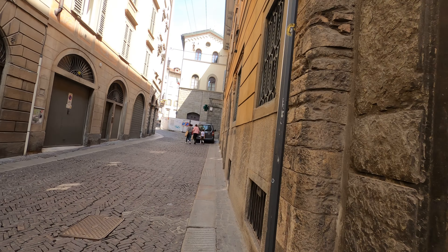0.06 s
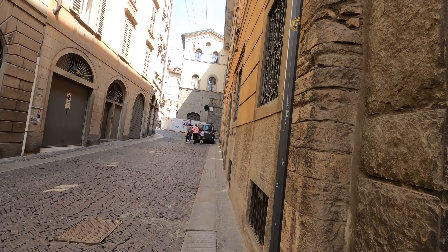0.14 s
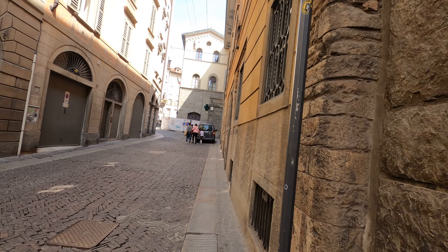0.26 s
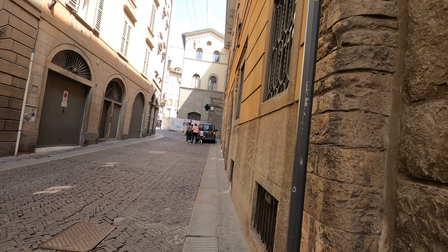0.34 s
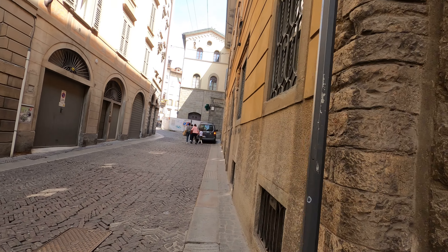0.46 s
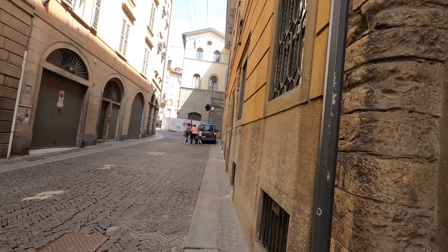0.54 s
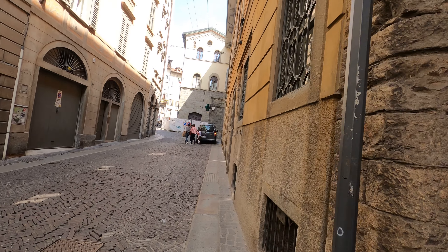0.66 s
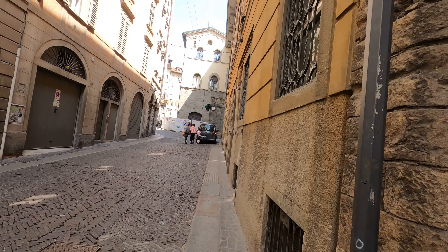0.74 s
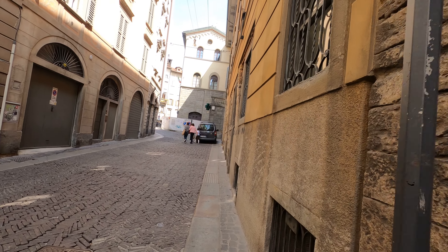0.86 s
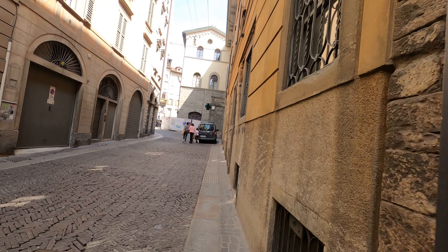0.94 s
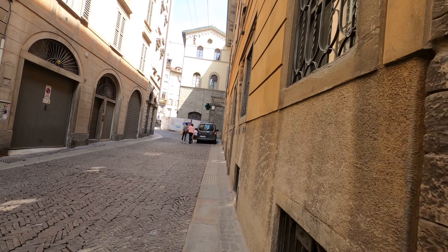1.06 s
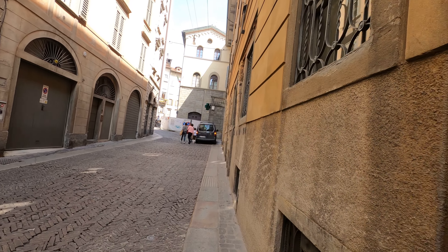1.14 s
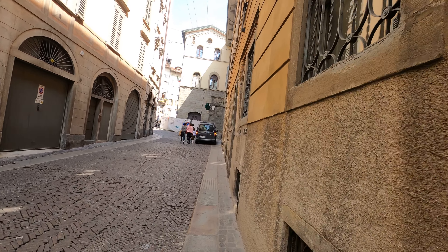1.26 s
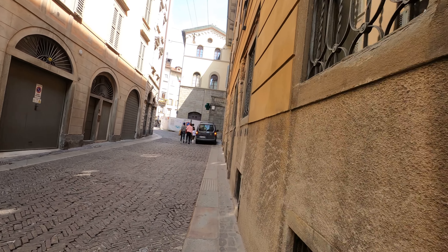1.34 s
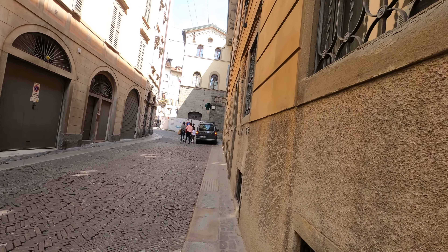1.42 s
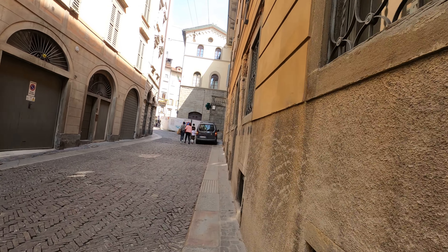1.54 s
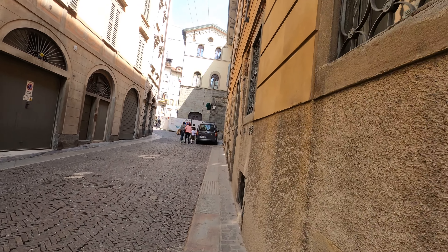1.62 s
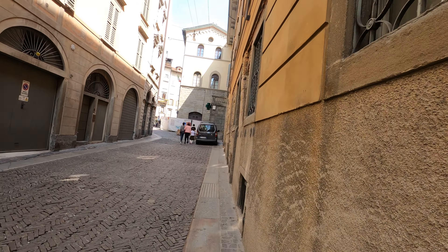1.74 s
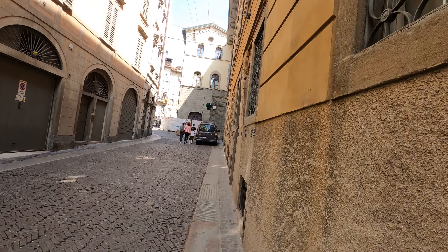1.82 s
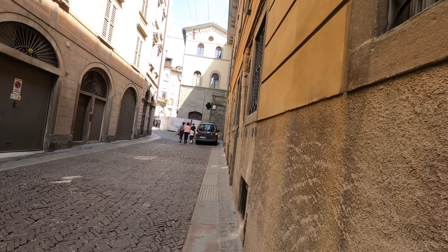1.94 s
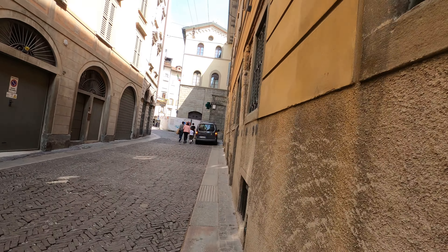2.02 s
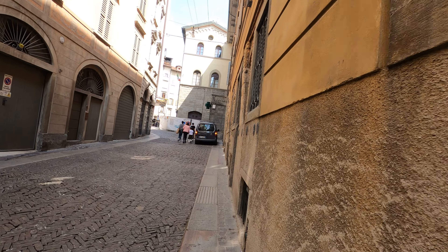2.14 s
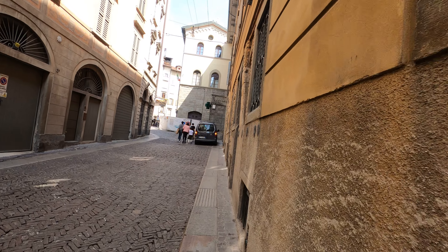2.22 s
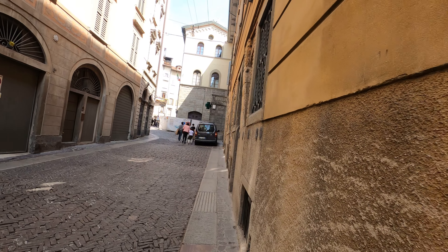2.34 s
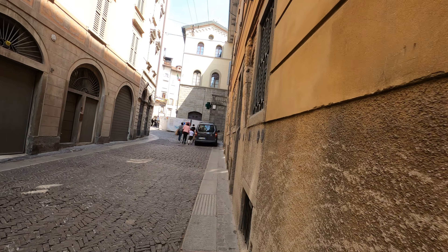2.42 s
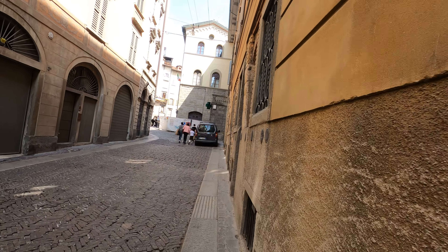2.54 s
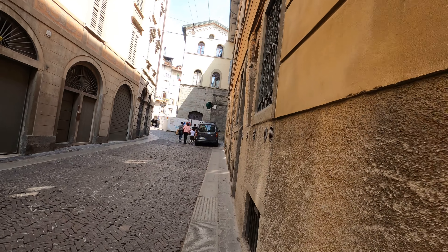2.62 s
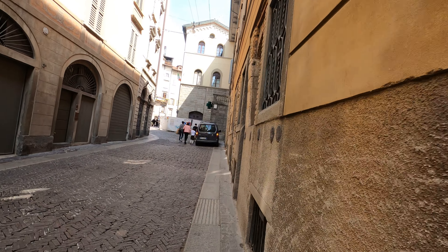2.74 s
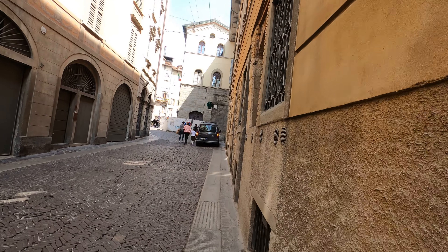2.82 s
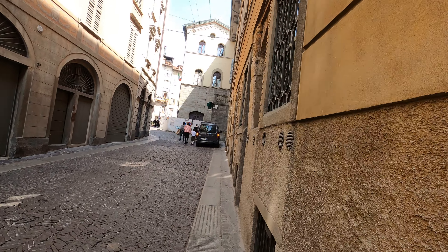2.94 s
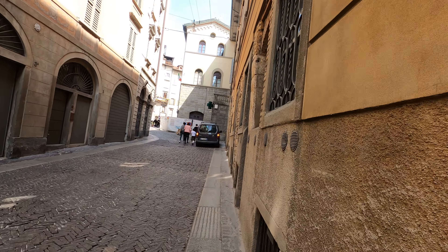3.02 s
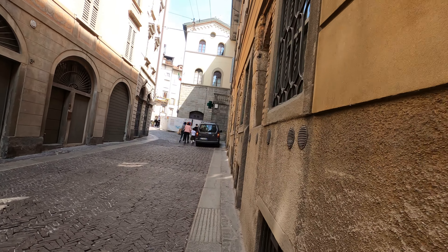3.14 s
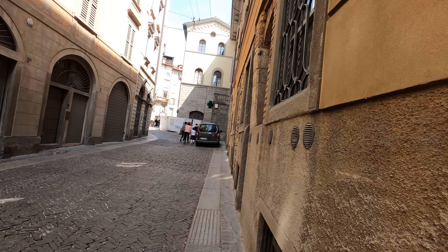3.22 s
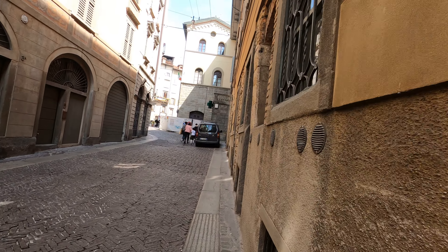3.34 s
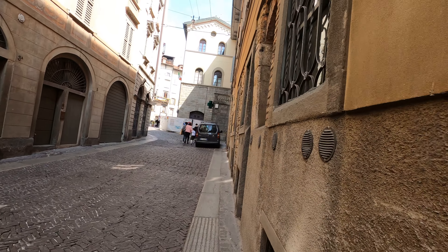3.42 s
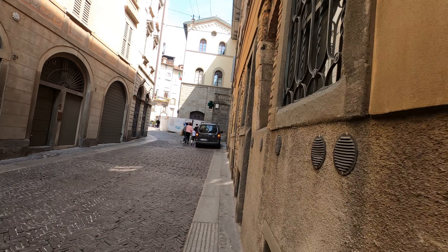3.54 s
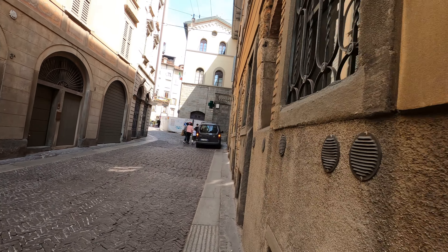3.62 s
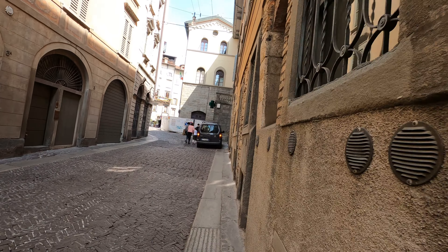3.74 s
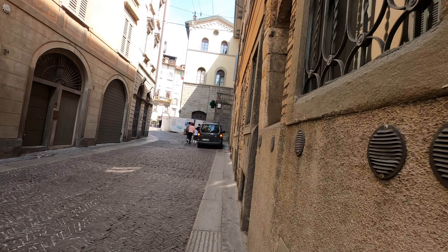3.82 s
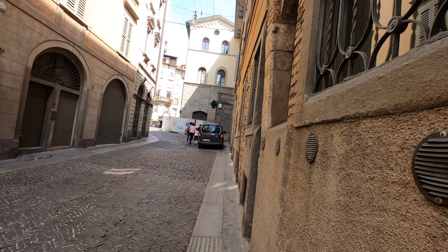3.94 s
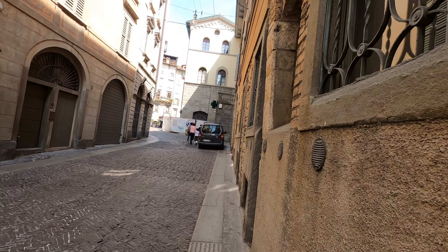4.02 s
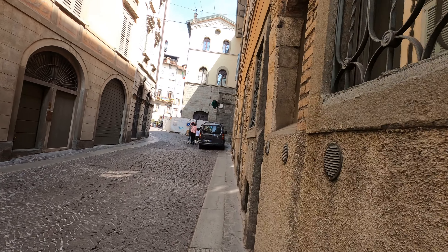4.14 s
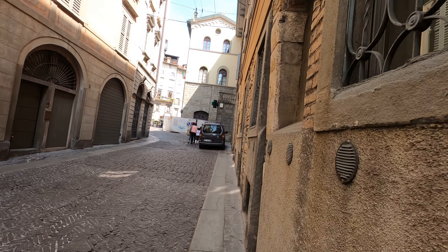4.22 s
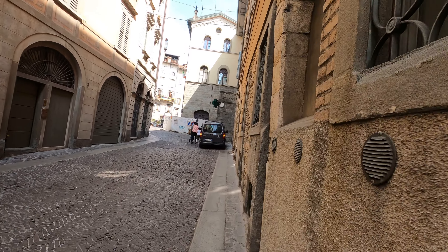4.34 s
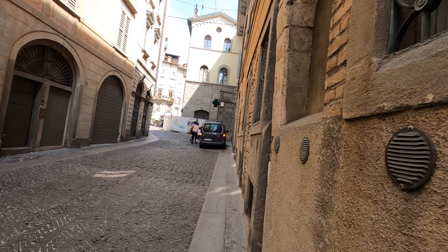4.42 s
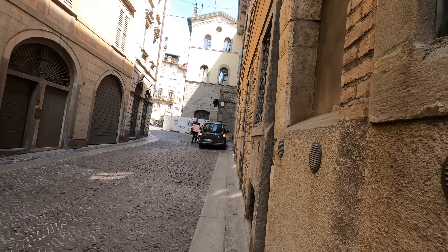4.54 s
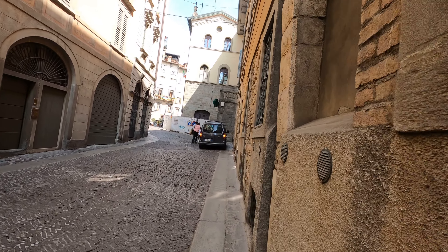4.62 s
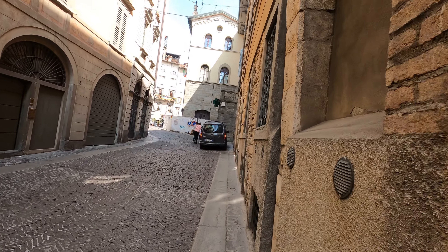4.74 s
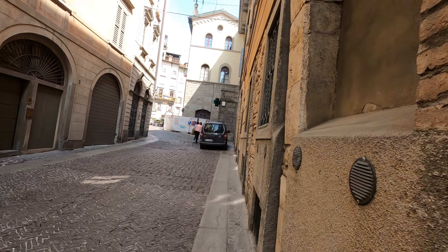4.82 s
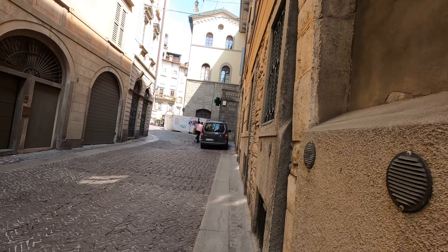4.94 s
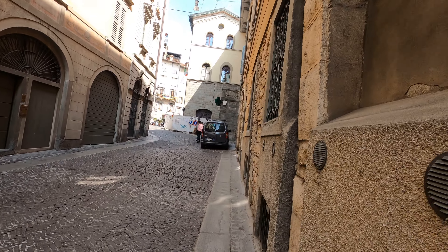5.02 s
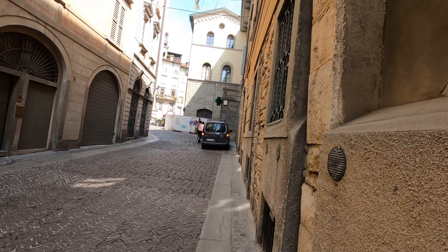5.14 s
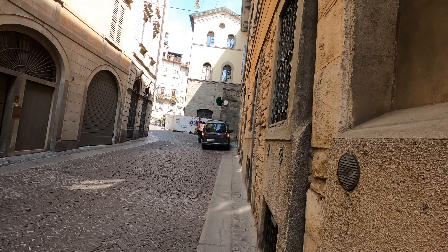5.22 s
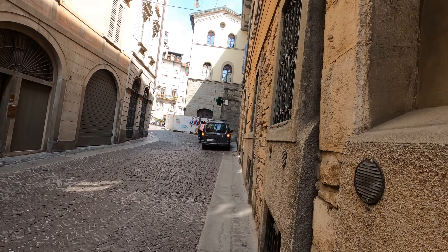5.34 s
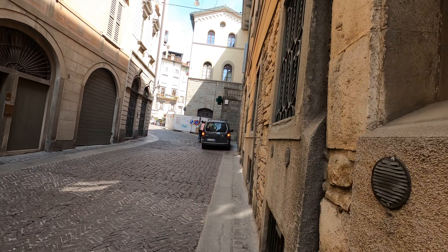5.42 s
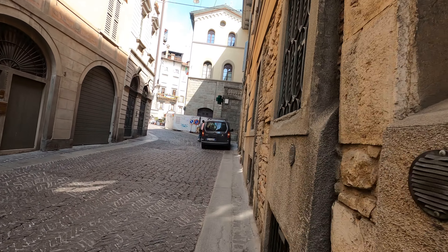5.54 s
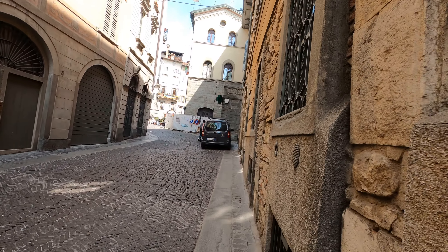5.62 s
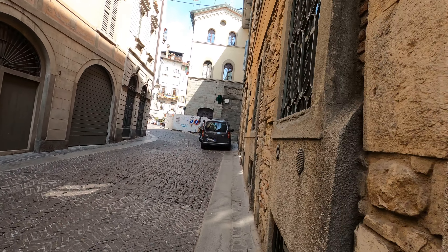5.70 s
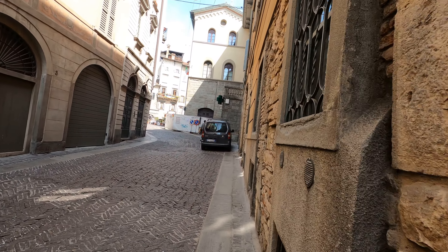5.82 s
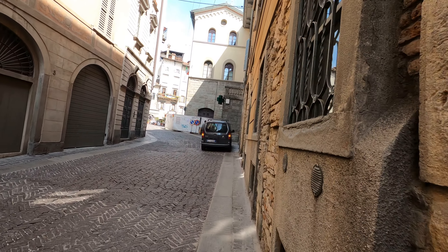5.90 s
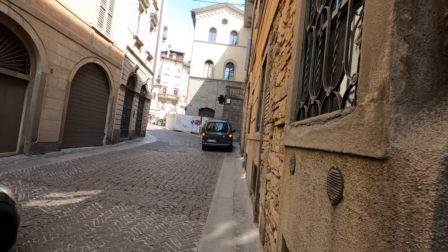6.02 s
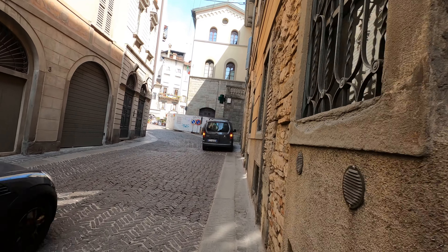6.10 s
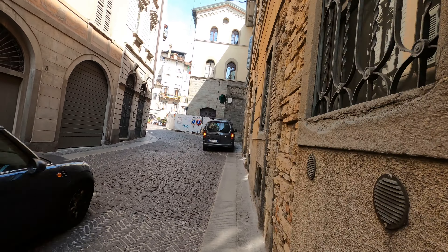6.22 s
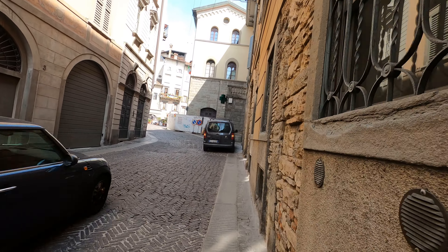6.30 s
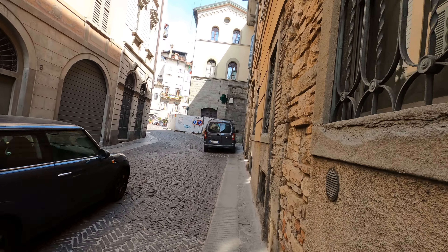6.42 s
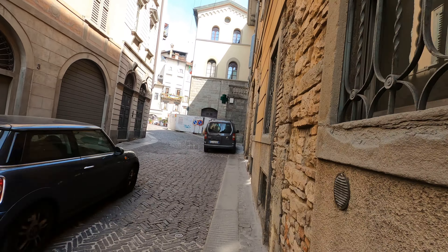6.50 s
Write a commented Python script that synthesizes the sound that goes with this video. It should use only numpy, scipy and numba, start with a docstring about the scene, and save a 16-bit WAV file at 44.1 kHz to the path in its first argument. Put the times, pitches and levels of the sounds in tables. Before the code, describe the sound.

A close, bass-heavy street ambience between stone house fronts. At 0 s a deep boom fades into tyre drone and soft hiss, with light wind bumps around 0.3-0.4 s. From about 0.3 s an exhaust hum swells and sinks, strongest near 0.9 s, while a fainter engine idles further off until about 3 s. Tiny airy scuffs and ticks are scattered through the first 3.5 s. At 2.05-2.3 s wind buffets the microphone heavily, louder on the left; then the treble dips briefly and the stereo narrows to the centre. Tyre roar peaks around 2.7-3.2 s. Cobbles thud strongly from 3.2 s, especially near 4 s, with a rough tread song around 4.8-5.8 s. The engine pitch falls from 4.3 s as its hum grows. Around 5.8-6.1 s come a dull wheel knock, small rattles and faint breathy whistles abreast; a low coasting hum continues to 6.6 s.

```python
"""A deep boom and the drone and hiss of tyres open the scene, soon joined by a humming exhaust:
a car comes up a narrow cobbled street from behind a walker and slows as it draws level.
Tyres and stones are trains of small blows and noise through resonant filters; engines are sums of sines.
Wind, noise shaped into eddies, buffets two microphone ports, after which the stereo picture
closes to the centre; scuffs, faint ticks, knocks and whistles are short or steady bands of noise."""
import sys
import numpy as np
from scipy import signal
from scipy.fft import rfft, irfft
from scipy.io import wavfile
from scipy.ndimage import uniform_filter1d, minimum_filter1d
from numba import njit

SR = 44100
rng = np.random.default_rng(int(sys.argv[2]) if len(sys.argv) > 2 else 0)


def persist_wave(psi):
    """Save psi, clipped to +-1, as 16-bit WAV."""
    counts = np.round(np.clip(psi, -1, 1) * 32767).astype(np.int16)
    wavfile.write(sys.argv[1], SR, np.atleast_2d(counts).T)


def level_to_linear(level):
    """Convert decibel levels to linear amplitude factors, elementwise."""
    exponent = np.asarray(level, float) / 20
    return 10 ** exponent


N = 289737
TIME = np.arange(N) / SR
HZ = np.maximum(np.arange(N // 2 + 1) * SR / N, 1)
CLOSE_S = 2.29  # the stereo picture starts to close and the treble dips


def curves(table):
    """Piecewise-linear envelopes: columns of a table joined by straight lines in time."""
    s, *columns = np.transpose(table)
    return [np.interp(TIME, s, c) for c in columns]


def colour(x, points):
    """Zero-phase spectral weighting by (Hz, dB) points on a log frequency axis."""
    hz, db = np.transpose(points)
    gain_db = np.interp(np.log(HZ), np.log(hz), db)
    return irfft(rfft(x) * level_to_linear(gain_db), N)


def peak(hz, width):
    """Lorentzian resonance curve, 1 at its centre and half at the edges of its width."""
    return 1 / (1 + (2 * (HZ - hz) / width) ** 2)


def unit(x):
    """Normalisation to an rms of 1."""
    return x / np.sqrt(np.mean(x ** 2))


def walk(rate):
    """Slow random modulation: levels held 1 / rate s and smoothed twice; spread near 1."""
    k = int(SR / rate)
    held = np.repeat(rng.standard_normal(N // k + 1), k)
    return 1.3 * uniform_filter1d(uniform_filter1d(held, k), k)[:N]


@njit
def svf(x, hz, width):
    """Second-order resonance: state-variable band-pass with a moving centre, gain 1 there."""
    y, band, low = np.empty(len(x)), 0., 0.
    for i in range(len(x)):
        g, k = np.tan(np.pi * hz[i] / SR), width[i] / hz[i]
        v = (band + g * (x[i] - low)) / (1 + g * (g + k))
        band = 2 * v - band
        low = low + 2 * g * v
        y[i] = k * v
    return y


def strikes(per_s, jitter, scatter_db):
    """Impulsive excitation: one blow per edge met, unevenly spaced, of uneven but bounded strength."""
    rate = per_s * np.exp(jitter * walk(60))
    count = np.floor(np.cumsum(rate) / SR)
    strength = level_to_linear(scatter_db * rng.uniform(0.23, 1, N))
    return np.diff(count, prepend=0) * strength


def bell(s, length):
    """Gaussian envelope: a smooth swell around s with standard deviation length."""
    return np.exp(-.5 * ((TIME - s) / length) ** 2)


def bursts(table, spread):
    """Transient band noise: short Gaussian swells, steep on both sides of their centre."""
    out = np.zeros(N)
    for s, db, length, hz in table:
        span = slice(max(int((s - .2) * SR), 0), int((s + 0.25) * SR))
        centre = np.full(N, 1. * hz)[span]
        noise = rng.standard_normal(len(centre))
        for _ in range(3):
            noise = svf(noise, centre, spread * centre)
        out[span] += level_to_linear(db) * bell(s, length)[span] * unit(noise)
    return out


def swells(table):
    """Power summation: level and centre Hz of overlapping swells; the strongest dominates the centre."""
    power = np.array([(level_to_linear(db) * bell(s, length)) ** 2 for s, db, length, _ in table]) + 1e-12
    total = np.sum(power, axis=0)
    return np.sqrt(total), np.transpose(table)[3] @ power / total


def engine(hz, db, overtones, waver, flutter_db):
    """Harmonic synthesis: firing tone and overtones; speed wavers, partials flutter as echoes shift."""
    high_revs_hz, coasting_hz = 70, 56.4
    load = np.clip((hz - coasting_hz) / (high_revs_hz - coasting_hz), 0, 1)
    phase = 2 * np.pi * np.cumsum(hz * (1 + waver * walk(12))) / SR
    # a pulling engine is more uneven than a coasting one
    uneven_db = flutter_db * (.2 + .8 * load)
    total = np.zeros(N)
    for multiple, high_db, coast_db in overtones:
        partial_db = coast_db + (high_db - coast_db) * load + uneven_db * walk(14)
        total += level_to_linear(partial_db) * np.sin(multiple * phase)
    return np.sqrt(2) * level_to_linear(db) * total


def tyres():
    """Rolling noise: dense blows and noise, coloured by the street, in bands that swell apart."""
    # tyres: t/s, roar level/dB, carcass drum against roar/dB, hiss against roar/dB
    rolling = [(0, -37.5, 7.5, -15), (.7, -34, 4.5, -18.5), (1.5, -35.5, 7, -17.5),
               (1.98, -31, -1.5, -17.5), (2.12, -31, -4, -17.5), (2.4, -29.5, 4, -17),
               (2.6, -28.5, 0, -18.5), (2.75, -27.5, -4.5, -19), (2.83, -27, -2, -18),
               (2.93, -29.5, 3, -16), (3.05, -27.5, 2, -20.5), (3.2, -28.5, 3, -18), (3.35, -30, 6, -19.5),
               (3.6, -30, 5.5, -18.5), (4.2, -30, 5, -19), (4.55, -30, 5.5, -20), (4.85, -28, 4.5, -21.5),
               (5.1, -29, 5, -21), (5.55, -29.5, 2, -21), (5.7, -28.5, -0.5, -19), (5.86, -30, -2, -14.5),
               (5.93, -30.5, -0.5, -15.5), (6.12, -33, -0.5, -15.5), (6.3, -36, 4.5, -11.5),
               (6.57, -33, -3, -17)]
    # colour of the whole roar in the street: f/Hz, spectral level/dB per Hz
    roar_colour = [(15, -9), (30, -16), (60, -4.5), (130, -2), (320, -9), (420, -16), (600, -18),
                   (900, -23), (1150, -24.5), (1500, -29.5), (2000, -35.5), (3000, -42.5), (6000, -56.5),
                   (8600, -63.5), (10500, -74), (13000, -83), (15500, -94)]
    # hand-overs between boom, drum, drone, low, middle and fine hiss: f/Hz
    handover_hz = [60, 480, 1600, 3300, 7000]
    # narrow rings in the roar: f/Hz, width/Hz, peak/dB
    roar_rings = [(250, 220, 0.5), (981, 270, 4), (4500, 1300, 1)]
    # deep body boom: t/s, level/dB
    body_boom = [(0, -18.5), (.6, -31), (1.2, -30), (1.8, -25), (2.5, -22.5), (3.3, -24.5), (3.75, -21),
                 (4.1, -32), (4.6, -24.5), (5, -27), (5.4, -28), (5.8, -21), (6.05, -37), (6.57, -29)]
    # middle of the hiss against the hiss: t/s, level/dB
    middle_hiss = [(0, -8), (.6, -7), (1.1, -8.5), (1.5, -5.5), (1.8, -8.5), (2.1, -10.5), (2.35, -9),
                   (2.55, -9), (2.7, -9.5), (2.9, -8.5), (3.1, -6), (3.25, -9), (3.5, -9.5), (4.3, -10),
                   (4.7, -7.5), (5.1, -9), (5.6, -8.5), (5.9, -9), (6.57, -10.5)]
    # finest treble against the hiss: t/s, level/dB
    fine_hiss = [(0, -23), (1.05, -28.5), (1.12, -26), (1.4, -18.5), (1.68, -21), (1.76, -37), (2.05, -20),
                 (2.17, -26), (2.2, -33), (2.4, -34), (2.74, -32.5), (2.8, -20.5), (2.9, -24.5),
                 (4.1, -21.5), (4.6, -16.5), (5.6, -16), (6.0, -22), (6.57, -27)]
    # tread song in rough patches, firmer as the car nears: t/s, f/Hz, level/dB
    tread_song = [(0, 817, -54.5), (2.5, 770, -54.5), (2.72, 777, -35.5), (2.9, 750, -50), (3.15, 725, -41),
                  (3.26, 710, -35), (3.4, 730, -49), (3.8, 745, -49), (3.92, 755, -38), (4.05, 760, -47),
                  (4.5, 790, -42), (4.63, 803, -38.5), (4.72, 806, -43), (4.82, 785, -34),
                  (4.92, 785, -30.5), (5.0, 813, -32.5), (5.1, 754, -30.5), (5.2, 763, -43),
                  (5.42, 806, -37), (5.66, 840, -42.5), (5.71, 880, -29.5), (5.77, 880, -33),
                  (5.84, 854, -28.5), (5.9, 855, -47.5), (6.57, 837, -54)]

    roar_db, drum_db, hiss_db = curves(rolling)
    # the treble dips briefly: time constants 5 ms falling, 60 ms recovering
    dip_db = -8 * np.exp(-np.abs(TIME - CLOSE_S) / np.where(TIME < CLOSE_S, 0.005, .06))
    low_hiss_db = roar_db + hiss_db + dip_db
    middle_db = low_hiss_db + curves(middle_hiss)[0]
    fine_db = low_hiss_db + curves(fine_hiss)[0] + dip_db
    song_hz, song_db = curves(tread_song)
    song_hz = song_hz * (1 + .02 * walk(45))

    patter = unit(strikes(np.full(N, 900.), jitter=.6, scatter_db=0.5))
    # loose grit crackles under the tread, about 250 grains a second
    grit = (rng.random(N) < 250 / SR) * rng.standard_normal(N) * level_to_linear(10.0)
    drive = 0.3 * patter + rng.standard_normal(N) + np.diff(grit, prepend=0)

    ring_db = sum(db * peak(hz, width) for hz, width, db in roar_rings)
    roar = rfft(colour(drive, roar_colour)) * level_to_linear(ring_db)
    # differences of successive high-pass curves split the roar into complementary bands
    above = [1] + [1 / (1 + (hz / HZ) ** 4) for hz in handover_hz] + [0]
    parts = [unit(irfft(roar * (a - b), N)) for a, b in zip(above, above[1:])]

    # the tread blocks sing in a band that drifts and breaks up
    song = unit(svf(svf(drive, song_hz, 0.17 * song_hz), song_hz, 0.3 * song_hz))
    parts.append(song * level_to_linear(2 * walk(35)))

    # boom, drum, drone, low hiss, middle hiss, fine hiss, song
    levels_db = [curves(body_boom)[0], roar_db + drum_db, roar_db + 0.36 * dip_db,
                 low_hiss_db, middle_db, fine_db, song_db]
    flicker_db = [1.5, 1.2, 0.63, 0.2, 1.2, 1.7, 0.78]
    return sum(p * level_to_linear(db + f * walk(9)) for p, db, f in zip(parts, levels_db, flicker_db))


def exhaust():
    """Periodic firing pulses as a harmonic series, shaped by interference between the house fronts."""
    # a gentle pull, then the foot comes off: t/s, firing rate f/Hz
    revs = [(0, 68.24), (.9, 71), (2, 72.94), (3.7, 75), (4.3, 73.36), (4.95, 68.58), (5.25, 65.06),
            (5.6, 60.33), (6.0, 57.4), (6.3, 54), (6.57, 51.55)]
    # swelling and sinking as echoes of the house fronts add or cancel: t/s, level/dB
    echo_level = [(.12, -43), (.3, -24), (.5, -30.5), (.65, -28), (.83, -33.5), (.89, -18.5), (1.0, -21.5),
                  (1.1, -24.5), (1.35, -22), (1.48, -25.5), (1.6, -26.5), (2.0, -28), (2.12, -40),
                  (2.25, -26), (2.55, -31.5), (2.72, -24.5), (2.9, -26), (3.1, -26), (3.2, -24), (3.3, -31),
                  (3.55, -29), (3.8, -32), (4.2, -27.5), (4.45, -32), (4.56, -24.5), (4.8, -27),
                  (4.88, -27), (4.97, -23.5), (5.09, -31.5), (5.18, -20), (5.5, -19.5), (5.85, -17.5),
                  (5.95, -15), (6.1, -14.5), (6.57, -18)]
    # lower partials: multiple of the firing rate, level at high revs/dB, level when coasting/dB
    orders = [(1, 1.5, 1.5), (1.5, -16, -25)]
    # upper overtones, each standing out at its own moments: t/s, 2nd, 3rd and 4th multiple level/dB
    upper = [(0, -40, -33, -39), (.25, -37, -44, -46), (.5, -30, -41, -36), (.75, -40, -30, -36),
             (.95, -33.5, -32, -37), (1.2, -39, -40, -48), (1.5, -42.5, -40.5, -46), (1.8, -32.5, -46, -40),
             (2.05, -30, -39, -40), (2.4, -44, -45.5, -46), (3.5, -38.5, -46.5, -48), (4.9, -39, -38, -44),
             (5.4, -45, -34, -48), (6.05, -35.5, -53, -48), (6.57, -48, -44, -51)]
    firing_hz = curves(revs)[0]
    hum = engine(firing_hz, *curves(echo_level), orders, waver=.003, flutter_db=.7)
    for multiple, db in enumerate(curves(upper), 2):
        hum = hum + engine(multiple * firing_hz, db, [(1, 0, 0)], waver=.004, flutter_db=1.5)
    return hum


def stones():
    """Forced vibration: thuds at the rate of the stone rows ring the tyre wall around that rate."""
    # rows of stones under the wheels: t/s, strike rate f/Hz, level/dB
    rows = [(0, 121, -40.5), (.5, 130, -40), (.95, 90, -36), (1.2, 97, -28), (1.55, 108, -31.5),
            (1.8, 121, -28.5), (2.0, 110, -29), (2.3, 110, -34), (2.9, 105, -29.5), (3.1, 85, -29),
            (3.2, 85, -21.5), (3.4, 79, -23), (3.68, 87, -28), (3.73, 119, -22.5), (3.85, 120, -31),
            (3.95, 125, -22.5), (4.07, 121, -20), (4.17, 118, -28.5), (4.3, 128, -24), (4.42, 112, -27.5),
            (4.55, 108, -24.5), (4.85, 102, -24), (5.2, 98, -24.5), (5.4, 85, -30.5), (5.75, 82, -24),
            (5.88, 83, -25), (5.98, 90, -35.5), (6.28, 95, -31), (6.4, 88, -30), (6.57, 90, -24.5)]
    per_s, db = curves(rows)
    blows = strikes(per_s, jitter=.12, scatter_db=3.5)
    thud = svf(svf(blows, per_s, 0.17 * per_s), per_s, 0.5 * per_s)
    running_rms = np.sqrt(uniform_filter1d(thud ** 2, size=SR // 2))
    return level_to_linear(db) * thud / running_rms


def hollow():
    """Cavity resonance: echoed roar caught in a resonance about a third of an octave wide."""
    # doorways and recesses the car passes: t/s, level/dB, standard deviation/s, f/Hz
    recesses = [(.7, -34.5, .25, 250), (1.9, -32, 0.43, 166.7), (2.55, -29.5, .3, 322),
                (3.15, -31.5, 0.091, 261), (3.6, -30, 0.094, 250), (4, -31, 0.2, 234),
                (4.65, -24.5, 0.045, 253), (5.33, -25, 0.042, 122.7), (5.65, -36, 0.087, 404),
                (5.95, -30, 0.054, 248), (6.15, -35.5, 0.13, 488), (6.42, -36, 0.11, 315)]
    gain, hz = swells(recesses)
    air = svf(svf(rng.standard_normal(N), hz, 0.28 * hz), hz, 0.38 * hz) / np.sqrt(hz)
    return gain * level_to_linear(.8 * walk(8)) * unit(air)


def bonnet():
    """Inverse-distance law: breathy fan and belt whistles from the engine bay weaken with distance."""
    # whistles: f/Hz, width/Hz, level/dB
    whistles = [(8770, 1300, 8), (11700, 2000, -6), (6500, 900, -8.5)]
    abreast_db, abreast_s = -65.5, 5.9
    # time to roll the kerb distance, coming and going
    coming_s, going_s = 0.27, .3
    shape = sum(level_to_linear(db) * peak(hz, width) for hz, width, db in whistles)
    breath = unit(irfft(rfft(rng.standard_normal(N)) * shape, N))
    # distance from the walker in kerb distances
    distance = np.hypot(1, (TIME - abreast_s) / np.where(TIME < abreast_s, coming_s, going_s))
    return level_to_linear(abreast_db + 1.0 * walk(14)) / distance * breath


def knocks():
    """Impact response: a wheel drops off a drain cover and the car rattles in brief noise bands."""
    # knocks: t/s, level/dB, standard deviation/s, centre f/Hz
    blows = [(5.825, -23.5, 0.018, 493), (5.845, -46, 0.0037, 3000), (5.875, -44, 0.0042, 2200),
             (5.915, -46, 0.011, 2300), (5.95, -46, .005, 2800), (6.085, -47.5, 0.011, 2500),
             (6.138, -29, 0.0034, 798)]
    return bursts(blows, spread=0.75)


def steps():
    """Transient band noise: brief airy scuffs and a few faint high ticks, dull at the very top."""
    # scuffs and ticks, before colouring: t/s, level/dB, standard deviation/s, centre f/Hz
    scuffs_and_ticks = [(0.133, -56.5, 0.0025, 11000), (0.459, -58.5, 0.029, 4950),
                        (.785, -55.5, 0.0065, 4500), (1.12, -61, 0.023, 4500), (1.925, -60, .01, 4499),
                        (2.09, -62.5, 0.03, 5500), (2.163, -59, .0015, 11000), (2.174, -62, 0.0013, 10000),
                        (2.27, -62, 0.012, 4000), (2.455, -64, 0.0053, 9000), (2.78, -62, .008, 5000),
                        (3.35, -60.5, .012, 7950), (3.475, -57.5, 0.0089, 4990)]
    airy = bursts(scuffs_and_ticks, spread=1.8)
    return colour(airy, [(5000, 5.5), (9000, -7.0), (15000, -12.5)])


def idler():
    """Harmonic series of a second engine idling further up the street, its speed wavering."""
    # idling engine: t/s, firing rate f/Hz, level/dB
    idling = [(0, 46.5, -43), (.75, 47.07, -28), (1.1, 46.6, -38.5), (1.9, 42.17, -32.5), (2.6, 42.36, -31),
              (3.2, 41.7, -40)]
    return engine(*curves(idling), [(1, 0, 0), (2, -14, -14)], waver=.03, flutter_db=3.0)


def wind():
    """Turbulence: unrelated eddies at each port, stronger on the left; the strongest mostly reach higher."""
    # buffets: t/s, level/dB, length (two standard deviations)/s, upper edge f/Hz
    gusts = [(.174, -39, 0.03, 70), (0.338, -25.5, 0.017, 70), (0.382, -27, 0.019, 160),
             (0.42, -30.5, 0.026, 79.5), (2.059, -25.5, 0.013, 100), (2.14, -18, 0.013, 90),
             (2.095, -14.5, 0.037, 255), (2.134, -20, 0.0056, 146), (2.16, -12, 0.027, 320),
             (2.184, -15, 0.041, 430), (2.225, -11, 0.0073, 340), (2.28, -14.5, 0.028, 382),
             (2.33, -27, 0.047, 220), (2.385, -28.5, 0.048, 150), (2.486, -28.5, 0.086, 279),
             (2.566, -30, 0.032, 220)]
    left_db = 2  # left port above right
    bells = np.array([level_to_linear(db) * bell(s, .5 * length) for s, db, length, _ in gusts]) + 1e-9
    power = np.sum(bells ** 2, axis=0)
    edge_hz = np.transpose(gusts)[3] @ bells ** 2 / power
    port_colour = [(15, -6.5), (40, 2.5), (150, 3.0), (400, -1.5), (900, -4.5),
                   (2000, -32.0), (8000, -44.5)]
    ports = []
    for _ in range(2):
        air = rng.standard_normal(N) * level_to_linear(3.5 * walk(90))
        eddies = unit(svf(air, .5 * edge_hz, 0.91 * edge_hz) / np.sqrt(edge_hz))
        # the same deep thump lies under every buffet
        thump = unit(svf(air, np.full(N, 45.), np.full(N, 70.)))
        squashed = np.tanh(0.57 * (eddies + 0.64 * thump))
        ports.append(unit(colour(squashed, port_colour)))
    return np.sqrt(power) * np.array(ports) * level_to_linear(np.array([[.5], [-.5]]) * left_db)


def scene():
    """Spatial coherence: two close ports hear alike in the bass, unlike and left-leaning in the treble."""
    # colour of the difference between the ports: f/Hz, level against the sum/dB
    port_width = [(60, -21.5), (140, -23), (320, -18), (490, -11), (800, -8), (1700, -5.5), (2800, -2),
                  (6000, 1.5), (12000, -0.5)]
    left_lean = .45  # correlation of the difference with the sum
    close_step_db, close_db_per_s = -5, -30
    mid = tyres() + exhaust() + stones() + hollow() + bonnet() + knocks() + steps() + idler()
    unlike = tyres() + steps()
    side = colour(left_lean * mid + np.sqrt(1 - left_lean ** 2) * unlike, port_width)
    # the width steps down, then keeps shrinking
    closing_db = close_step_db + close_db_per_s * (TIME - CLOSE_S)
    side = side * level_to_linear(np.where(TIME > CLOSE_S, closing_db, 0))
    return np.array([mid + side, mid - side]) + wind()


def low_pass(x):
    """Removes everything above the highest recorded frequency."""
    return signal.sosfilt(signal.butter(12, 15600, fs=SR, output="sos"), x)


def record(dry):
    """Gain control: microphones drop the deepest bass; a look-ahead limiter serves both channels."""
    mic_low_hz, limit_db, limit_s = 18, -5.2, .012
    dry = signal.sosfilt(signal.butter(2, mic_low_hz, "high", fs=SR, output="sos"), dry)
    k = int(limit_s * SR)
    loudest = np.max(np.abs(dry), axis=0)
    room = np.minimum(level_to_linear(limit_db) / (loudest + 1e-9), 1)
    gain = uniform_filter1d(uniform_filter1d(minimum_filter1d(room, 2 * k), k), k)
    return low_pass(dry * gain)


dry = scene()
out = record(dry)
persist_wave(out)
```